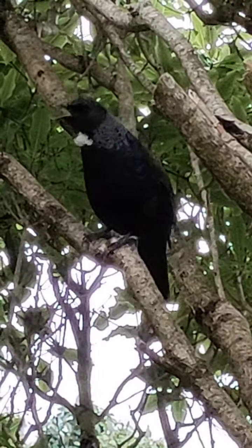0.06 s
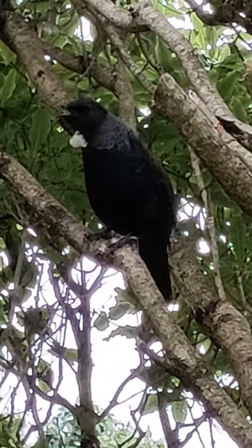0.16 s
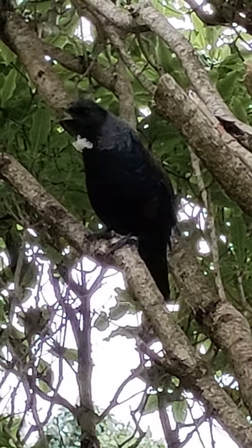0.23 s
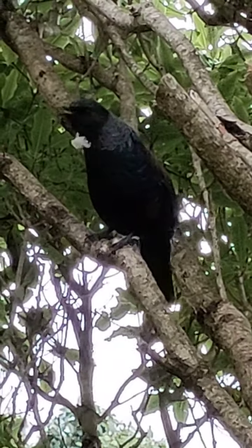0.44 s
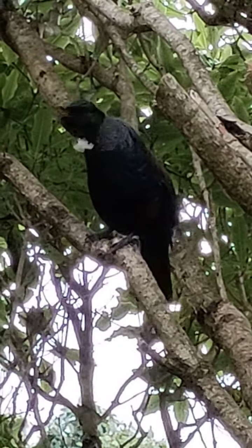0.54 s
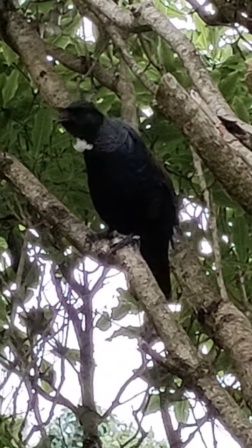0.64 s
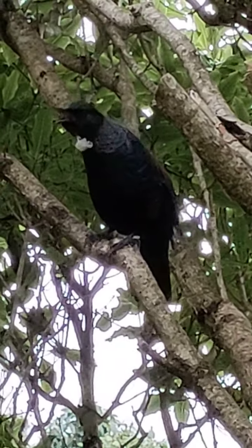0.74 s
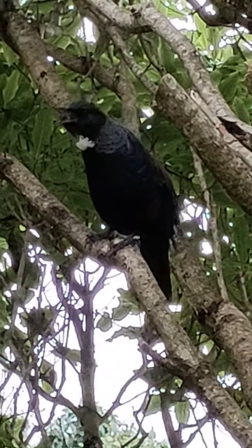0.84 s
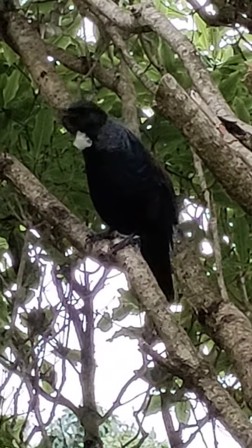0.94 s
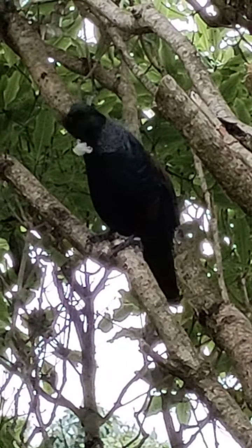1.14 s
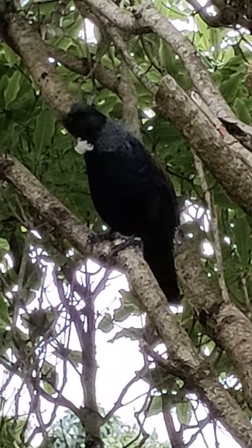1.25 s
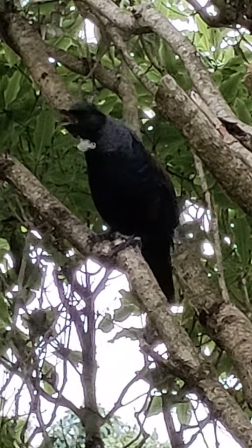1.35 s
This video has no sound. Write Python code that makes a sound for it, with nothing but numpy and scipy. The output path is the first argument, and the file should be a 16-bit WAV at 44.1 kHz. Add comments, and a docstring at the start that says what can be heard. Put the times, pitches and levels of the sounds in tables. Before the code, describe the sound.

A songbird sings one quick phrase of whistles, a rasping trill and clucks.

```python
"""A songbird sings one quick phrase with the two sides of its syrinx: thin pips, a falling whistle,
a rasping trill, a rising two-voiced note, a long reedy note that swoops down, and two low clucks.
Sounding together, the two voices add sum and difference tones; the throat shapes the partials.
Trunks and leaves scatter each note into a short tail over a faint outdoor hush and two dull bumps."""
import sys
import numpy as np
from scipy import signal
from scipy.fft import rfft, irfft
from scipy.io import wavfile
from scipy.ndimage import uniform_filter1d

SR = 44100
rng = np.random.default_rng(int(sys.argv[2]) if len(sys.argv) > 2 else 0)


def dump(signal):
    """Clip the signal to [-1, 1] and save it as 16-bit WAV at the path in sys.argv[1]."""
    limited = np.clip(np.atleast_2d(signal).T, -1, 1)
    pcm = np.round(limited * 32767).astype(np.int16)
    wavfile.write(sys.argv[1], SR, pcm)


N = 61739


def amp(db):
    """Decibels to gain."""
    return 10 ** (np.asarray(db) / 20)


def unit_rms(x):
    """Scales to rms 1."""
    return x / np.sqrt(np.mean(x ** 2) + 1e-20)


def at_hz(table, hz):
    """Interpolates a table over log frequency."""
    table_hz, value = np.transpose(table)
    return np.interp(np.log(hz + 1), np.log(table_hz), value)


def shaped(x, spectrum_db):
    """Filters by a spectrum."""
    gain = amp(at_hz(spectrum_db, np.fft.rfftfreq(2 * SR, 1 / SR)))
    return irfft(rfft(x, 2 * SR) * gain)[..., :N]


def add(mix, start_s, sound):
    """Mixes a sound in place."""
    part = mix[max(round(start_s * SR), 0):][:len(sound)]
    part += sound[:len(part)]


def wander(size, rate_hz):
    """Smooth random motion, rms about 1."""
    hz = np.fft.rfftfreq(16384, 1 / SR)
    spectrum = rfft(rng.standard_normal(16384)) / (1 + (hz / rate_hz) ** 4)
    return unit_rms(irfft(spectrum))[:size]


# (frequency [Hz], relative density [dB])
HUSH_SPECTRUM = [(15, -16.5), (35, -1.5), (60, -4), (130, 3.5), (300, 0.5), (500, -6), (1000, -7.5),
                 (2000, -13.5), (4000, -13.5), (7000, -24), (9000, -36.5), (15000, -30.5)]
# (time [s], level [dB])
HUSH_LEVEL = [(0, -86), (.25, -79), (.6, -77), (1.15, -74.5), (1.4, -83)]

def hush(coherence=0.12):
    """Faint distant rumble and air in the leaves."""
    left, independent = shaped(rng.standard_normal((2, 2 * SR)), HUSH_SPECTRUM)
    right = coherence * left + np.sqrt(1 - coherence ** 2) * independent
    level_db = np.interp(np.arange(N) / SR, *np.transpose(HUSH_LEVEL))
    return unit_rms(np.array([left, right])) * amp(level_db)


# (time [s], pitch [Hz], level [dB])
BUMPS = [(0.599, 386.3, -70), (1.053, 339, -65)]

def bumps(attack_s=0.0018, decay_s=0.025):
    """Faint dull knocks, as of a shifting branch."""
    out, t = np.zeros(N), np.arange(SR // 5) / SR
    envelope = np.minimum(t / attack_s, 1) * np.exp(-t / decay_s)
    for start_s, hz, db in BUMPS:
        add(out, start_s, amp(db) * envelope * np.sin(2 * np.pi * hz * t))
    return out


# leaves scatter treble most: (frequency [Hz], gain [dB])
LEAF_COLOUR = [(1000, -2), (3300, -4.5), (5000, 1), (11000, -0.5)]

def scatter(t60_table, build_s=0.0054):
    """Stereo tail of random reflections; each band dies at its own rate."""
    hz, frame_s, bands = signal.stft(rng.standard_normal((2, SR)), SR, nperseg=256)
    decay = amp(-60 * frame_s / at_hz(t60_table, hz)[:, None])
    tail = signal.istft(bands * decay, SR, nperseg=256)[1][:, :SR]
    tail *= 1 - np.exp(-np.arange(SR) / SR / build_s)
    return shaped(tail / np.linalg.norm(tail, axis=1, keepdims=True), LEAF_COLOUR)


# (left delay [s], right delay [s], gain [dB])
TRUNK_ECHOES = [(.0031, 0.0032, -19.5), (.0068, .00655, -8.5), (0.0123, 0.007, -6.5)]
# scatter decay: (frequency [Hz], T60 [s])
NEAR_T60 = [(500, 0.22), (1500, 0.24), (3300, 0.3), (6000, 0.25), (9000, 0.26), (15000, 0.16)]
FAR_T60 = [(3000, 0.37), (6000, 0.88), (10000, 0.15)]

def trees(sound, beamed_aside, aside_db=-8, pan_db=1, right_lag_s=0.00002):
    """Direct path, trunk echoes, near and far scatter. Sound beamed aside arrives mostly as scatter."""
    hz = np.fft.rfftfreq(2 * SR, 1 / SR)
    paths = np.array([np.full(len(hz), amp(-pan_db)),
                      amp(pan_db) * np.exp(-2j * np.pi * hz * right_lag_s)])
    for left_s, right_s, db in TRUNK_ECHOES:
        paths += amp(db) * np.exp(-2j * np.pi * np.outer([left_s, right_s], hz))
    early = irfft(rfft(sound + amp(aside_db) * beamed_aside, 2 * SR) * paths)[:, :N]
    tail = amp(-1) * scatter(NEAR_T60) + amp(-27.5) * scatter(FAR_T60)
    return early + signal.fftconvolve((sound + beamed_aside)[None], tail, axes=1)[:, :N]


def syrinx(curve, partials_db=(0,), jitter=0.0039, jitter_hz=300, shimmer_db=1,
           edge_s=0.0039, throat=None):
    """One voice follows (time [s], pitch [Hz], level [dB]) unsteadily; returns start [s] and sound."""
    times_s, pitches_hz, levels_db = np.transpose(curve)
    t = np.arange(times_s[0], times_s[-1], 1 / SR)
    hz = np.interp(t, times_s, pitches_hz) * (1 + jitter * wander(len(t), jitter_hz))
    phase = 2 * np.pi * np.cumsum(hz) / SR
    tone = np.zeros(len(t))
    for k, db in enumerate(partials_db, 1):
        throat_db = 0 if throat is None else at_hz(throat, k * hz)
        tone += amp(db + throat_db) * (k * hz < SR / 2) * np.sin(k * phase)
    fade = np.clip(np.minimum(t - t[0], t[-1] - t) / edge_s, 0, 1)
    level_db = np.interp(t, times_s, levels_db) + shimmer_db * wander(len(t), jitter_hz)
    return times_s[0], np.sqrt(2) * tone * fade * amp(level_db)


# per note: (time [s], pitch [Hz], level [dB])
OVERTONES = [
    [(.195, 12900, -85), (.215, 12200, -72), (.226, 11760, -75), (.238, 9070, -75.5)],
    [(.298, 13200, -79), (.313, 11440, -71.5), (.322, 10200, -79), (.334, 10200, -84)],
]

def overtones():
    """Thin falling overtones of whistle and slur, beamed away from the listener."""
    out = np.zeros(N)
    for curve in OVERTONES:
        add(out, *syrinx(curve, jitter=0.011, jitter_hz=700))
    return out


# (frequency [Hz], relative density [dB])
FIZZ_SPECTRUM = [(3200, -54), (3800, -0.5), (4900, -10.5), (5800, 2.5), (7000, 1), (9600, -15.5),
                 (10900, -5.5), (12500, -18), (14000, -7.5), (15500, -17.5)]
# (time [s], level [dB])
FIZZ_LEVEL = [(.88, -97.5), (.915, -68.5), (.935, -58.5), (.975, -57.5), (0.99, -72.5), (1.011, -110)]

def fizz():
    """Fine hiss flaring in the swoop."""
    level_db = np.interp(np.arange(N) / SR, *np.transpose(FIZZ_LEVEL), left=-np.inf, right=-np.inf)
    return amp(level_db) * unit_rms(shaped(rng.standard_normal(N), FIZZ_SPECTRUM))


# per note: (time [s], pitch [Hz], source level [dB])
CLUCKS = [
    [(1.07, 1379, -60), (1.08, 1608, -60.5), (1.092, 1633, -48), (1.102, 1706, -42.5), (1.1075, 1377, -38),
     (1.111, 1123, -44.5), (1.115, 945, -57.5), (1.122, 606, -58.5)],
    [(1.126, 1335, -45), (1.134, 1615, -46), (1.146, 1697, -37), (1.1505, 1438, -41), (1.155, 1110, -44),
     (1.161, 755, -53), (1.169, 516, -57.5)],
]
# throat, first and second cluck: (frequency [Hz], gain [dB])
THROAT_DARK = [(300, 0), (600, 5), (1050, 0.5), (1400, -35.5), (1700, -22), (1860, -61), (2150, -10),
               (3300, -5.5), (4000, -5.5), (5000, -8), (7000, -33), (9000, -37.5), (15000, -27.5)]
THROAT_OPEN = [(300, -9), (600, 1), (1050, -0.5), (1400, -22.5), (1860, -38), (2300, -27), (2800, -9.5),
               (3300, -5.5), (3900, -12), (4700, -3), (5200, -8.5), (5800, -15.5), (9000, -52.5),
               (15000, -35)]

def clucks():
    """Two low notes plunge, sweeping partials through the throat's resonances; the second is brighter."""
    out = np.zeros(N)
    partials_db = [-3, 0, -13.5, -7.5, -5.5, -16, -6.5, -10.5]
    for curve, throat in zip(CLUCKS, (THROAT_DARK, THROAT_OPEN)):
        add(out, *syrinx(curve, partials_db, jitter=0.01, jitter_hz=587, throat=throat))
    return out


# per note: (time [s], pitch [Hz], source level [dB])
WHISTLES = [
    [(.04, 6490, -55), (.046, 6620, -54), (.053, 6560, -54), (.061, 6150, -63), (.07, 5840, -68)],
    [(.074, 6540, -70.5), (.09, 6380, -76), (.098, 7000, -83)],
    [(.086, 4890, -73.5), (.095, 4520, -80), (.108, 4430, -80)],
    [(.19, 7100, -74), (.2, 6490, -56.5), (.216, 6224, -46.5), (.226, 5650, -46.5), (.236, 4940, -46.5),
     (.245, 4895, -50), (.256, 4310, -61.5), (.272, 3970, -78)],
]
PIPS = [
    [(0, 3860, -67.5), (.012, 3777, -78.5), (.028, 4110, -79), (.044, 4010, -86)],
    [(.15, 3910, -88), (.168, 4200, -75.5), (.182, 4090, -82.5), (.194, 4340, -69)],
]
SLUR = [(.311, 5380, -60.5), (.322, 5100, -56), (.338, 5200, -56.5), (.356, 5230, -54.5)]
# (frequency [Hz], gain [dB])
PIP_THROAT = [(4000, -2), (8000, -1), (11800, -6.5), (12700, -40), (15000, -28)]

def whistles():
    """Pure whistles, soft reedy pips and a husky slur into the trill."""
    out = np.zeros(N)
    for curve in WHISTLES:
        add(out, *syrinx(curve))
    for curve in PIPS:
        add(out, *syrinx(curve, partials_db=[0, 0, 0], throat=PIP_THROAT))
    add(out, *syrinx(SLUR, jitter=0.035, jitter_hz=850, shimmer_db=-0.5))
    return out


def rasp(bursts, throat, partials_db, jitter, sag):
    """Short bursts shake fast in pitch and level; each falls by the fraction sag of its pitch."""
    out = np.zeros(N)
    for start_s, length_s, hz, db in bursts:
        curve = [(start_s, hz * (1 + sag / 2), db), (start_s + length_s, hz * (1 - sag / 2), db)]
        add(out, *syrinx(curve, partials_db, jitter, jitter_hz=850, shimmer_db=4, edge_s=0.0031))
    return shaped(out, throat)


# (time [s], length [s], pitch [Hz], source level [dB])
HIGH_BURSTS = [(.343, 0.035, 7280, -53.5), (.364, 0.02, 7540, -53.5), (.394, 0.016, 7580, -47),
               (.426, 0.014, 7500, -49), (.459, 0.024, 8560, -53), (.497, 0.022, 7680, -59.5)]
LOW_BURSTS = [(.353, 0.018, 4865, -46), (.377, 0.02, 4934, -48.5), (.409, 0.019, 4765, -45.5),
              (.439, 0.019, 4890, -46), (.472, 0.012, 4887, -46), (.499, 0.021, 4990, -49)]
# (frequency [Hz], gain [dB])
HIGH_THROAT = [(4000, -40), (6000, -15), (6900, -4.5), (7900, -7), (9300, -6.5), (10200, -14), (11000, 11),
               (12300, 26.5), (13300, -14), (14700, 2), (15600, -24)]
LOW_THROAT = [(3500, -63), (4200, -40), (4650, -2.5), (5200, -5.5), (5650, -37.5), (6200, -42), (9500, -7),
              (11500, 5), (13000, -29), (14500, -8), (15500, -9)]
# (time [s], pitch [Hz], level [dB])
CHIPS = [(0.3352, 7225, -42.5), (0.492, 7440, -42)]

def trill(chip_s=0.0052, chip_glide=0.051):
    """The two voices rasp in turn between two sharp rising chips."""
    out = rasp(HIGH_BURSTS, HIGH_THROAT, partials_db=[0, -32], jitter=0.07, sag=0.053)
    out += rasp(LOW_BURSTS, LOW_THROAT, partials_db=[0, -24, -34], jitter=0.03, sag=0.1)
    for start_s, hz, db in CHIPS:
        curve = [(start_s, hz * (1 - chip_glide), db), (start_s + chip_s, hz * (1 + chip_glide), db)]
        add(out, *syrinx(curve, edge_s=0.0025))
    return out


# throat, for combination tones: (frequency [Hz], gain [dB])
COMBINATION_THROAT = [(4800, -16.5), (6500, 1.5), (9000, -12.5), (11000, 3), (13300, 4), (15500, -5)]

def duet(low_curve, high_curve, low_partials_db, sidebands_db,
         jitter, shimmer_db, octave_db, shake_rad, shake_s=0.0012):
    """The low voice modulates the high one unsteadily, adding difference and sum tones."""
    low, high = np.zeros((2, N))
    add(low, *syrinx(low_curve, low_partials_db, jitter=0.002))
    add(high, *syrinx(high_curve, [0, octave_db], jitter, shimmer_db=shimmer_db))
    times_s, low_hz, _ = np.transpose(low_curve)
    phase = 2 * np.pi * np.cumsum(np.interp(np.arange(N) / SR, times_s, low_hz)) / SR
    phase += shake_rad * unit_rms(uniform_filter1d(rng.standard_normal(N), round(shake_s * SR)))
    coupling = sum(amp(db) * np.exp(1j * k * phase) for k, db in zip((-1, 1, 2), sidebands_db))
    combination_tones = (signal.hilbert(high) * coupling).real
    return low + high + shaped(combination_tones, COMBINATION_THROAT)


# (time [s], pitch [Hz], source level [dB])
RISE_LOW = [(.622, 3080, -78.5), (0.636, 3363, -56), (0.667, 3310, -49), (0.698, 3342, -48.5),
            (0.717, 3430, -57), (0.73, 3885, -52), (0.74, 4010, -69.5)]
RISE_HIGH = [(.615, 4490, -72), (0.633, 4940, -63.5), (0.65, 5400, -52.5), (0.664, 5634, -48.5),
             (0.68, 5670, -52.5), (0.691, 6086, -48), (0.701, 6560, -68), (.72, 6830, -62.5)]
SIDE_TONE = [(.636, 3750, -79), (.67, 4020, -76.5), (.705, 4150, -75.5), (.725, 4450, -75)]
# low voice, harmonics 1-4: (gain [dB])
RISE_PARTIALS_DB = [-4, -38, -43.5, -41]
# high - low, high + low, high + 2 low: (gain [dB])
RISE_SIDEBANDS_DB = [-44, -26.5, -43]

def rise():
    """Both voices climb, with a faint side tone between them."""
    out = duet(RISE_LOW, RISE_HIGH, RISE_PARTIALS_DB, RISE_SIDEBANDS_DB,
               jitter=0.0097, shimmer_db=2.5, octave_db=-34.5, shake_rad=1.1)
    add(out, *syrinx(SIDE_TONE, jitter=0.028))
    return out


# (time [s], pitch [Hz], source level [dB])
SWOOP_LOW = [(.733, 2030, -70.5), (0.744, 2317, -57.5), (0.761, 2426, -58), (0.804, 2417, -60),
             (0.834, 2356, -62), (0.867, 2198, -60), (0.888, 2190, -64.5), (0.914, 2217, -56),
             (0.929, 2020, -61.5), (0.951, 1850, -62.5), (0.98, 1668, -70.5)]
SWOOP_HIGH = [(0.728, 7700, -74), (0.743, 8600, -68.5), (0.772, 8570, -65), (.801, 8730, -66.5),
              (.807, 9500, -87.5), (.813, 10360, -76), (.835, 9900, -76), (0.849, 9180, -64.5),
              (0.872, 8800, -51.5), (0.898, 8900, -49.5), (0.913, 8980, -59.5), (0.933, 7786, -49.5),
              (.951, 7110, -42), (0.963, 6440, -33), (0.975, 5777, -38), (.987, 4808, -45)]
# added octave: (time [s], level re SWOOP_LOW [dB])
SWOOP_OCTAVE = [(.733, -17), (.78, -12), (.815, 2.5), (.86, -7.5), (.895, 4.5), (.915, 2.5), (.935, -11.5),
                (.95, -5)]
# low voice, harmonics 1-5: (gain [dB])
SWOOP_PARTIALS_DB = [-2, -18, -19, -33, -33]
# high - low, high + low, high + 2 low: (gain [dB])
SWOOP_SIDEBANDS_DB = [-22, -21, -39]

def swoop():
    """Long reedy two-voiced arch; the low voice's octave swells before both swoop down."""
    out = np.zeros(N)
    octave = [(s, 2 * hz, db + np.interp(s, *np.transpose(SWOOP_OCTAVE))) for s, hz, db in SWOOP_LOW]
    add(out, *syrinx(octave, jitter=0.001))
    return out + duet(SWOOP_LOW, SWOOP_HIGH, SWOOP_PARTIALS_DB, SWOOP_SIDEBANDS_DB,
                      jitter=0.0067, shimmer_db=2.38, octave_db=-36.5, shake_rad=0.3)


def scene():
    """The bird among the trees."""
    song = whistles() + trill() + rise() + swoop() + fizz() + clucks()
    return trees(song + bumps(), beamed_aside=overtones()) + hush()


def record(dry):
    """Steep low-pass at 15650 Hz."""
    lowpass = signal.firwin(511, 15650, window=("kaiser", 9), fs=SR)
    return signal.oaconvolve(dry, lowpass[None], "same")


dry = scene()
out = record(dry)
dump(out)
```